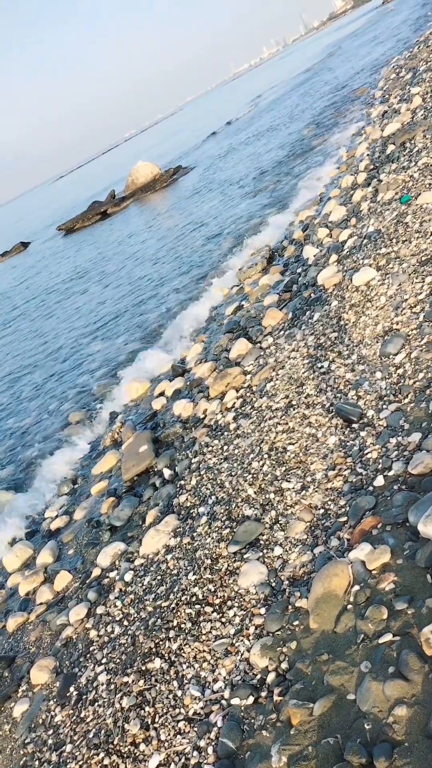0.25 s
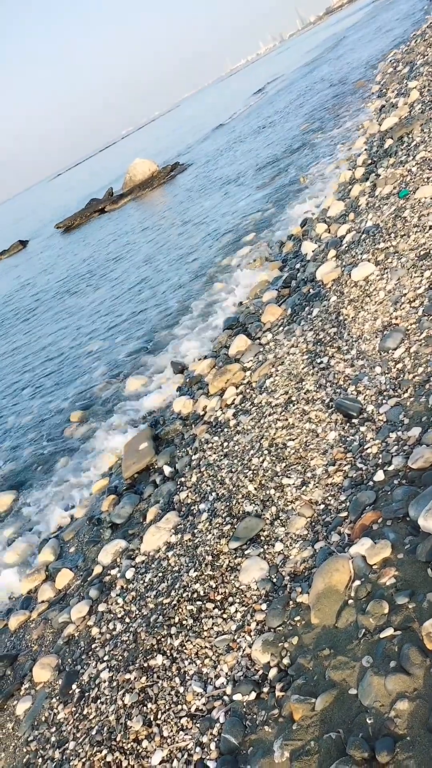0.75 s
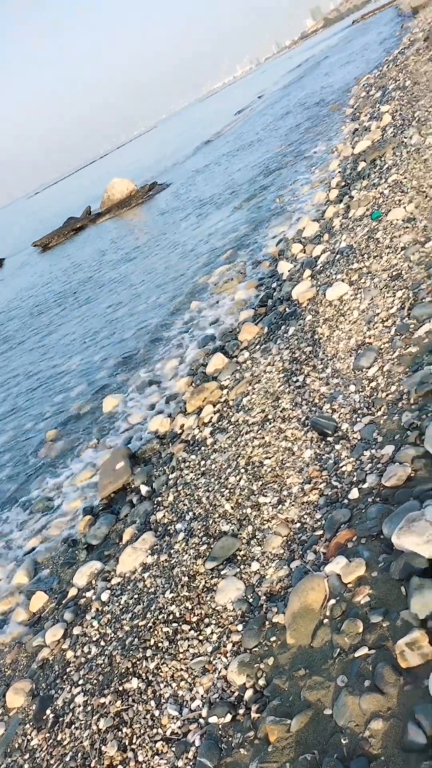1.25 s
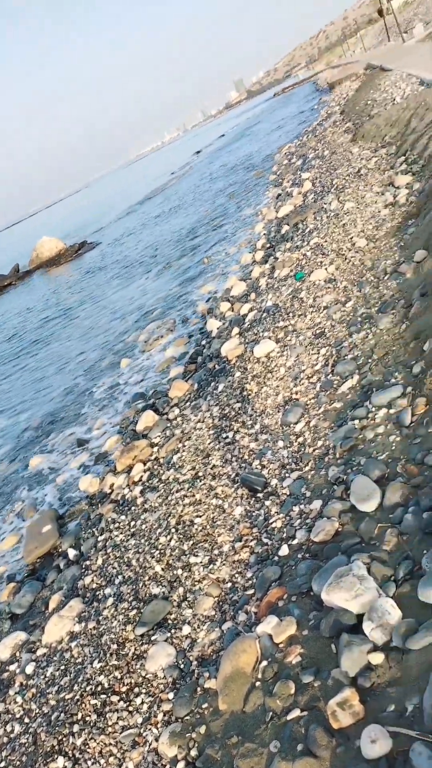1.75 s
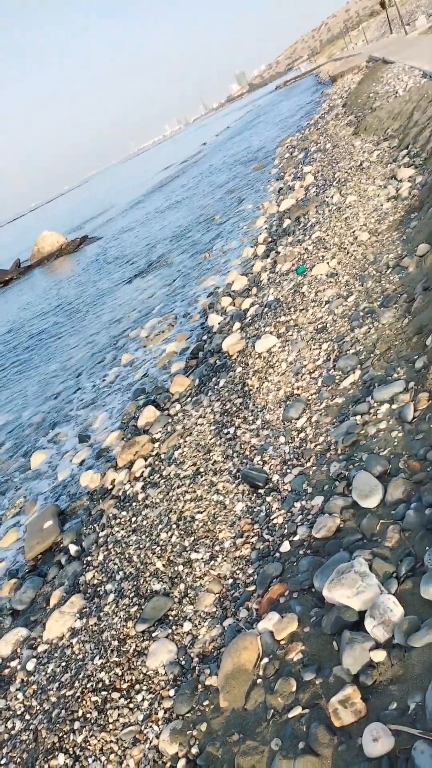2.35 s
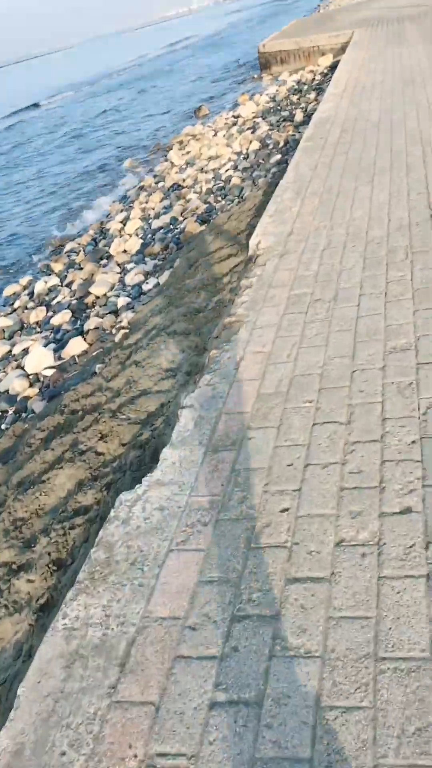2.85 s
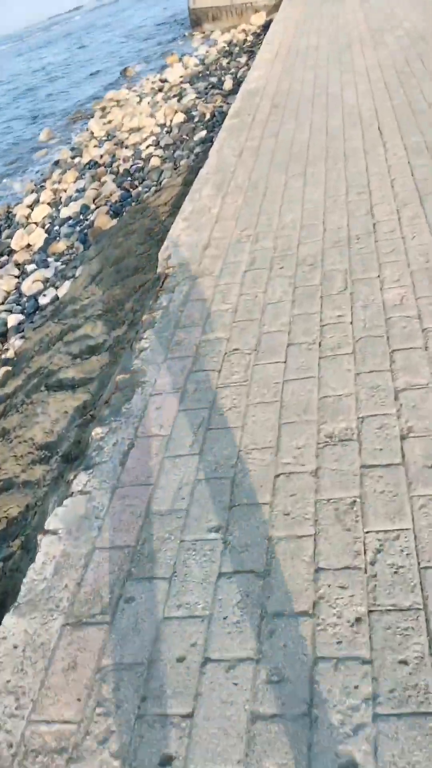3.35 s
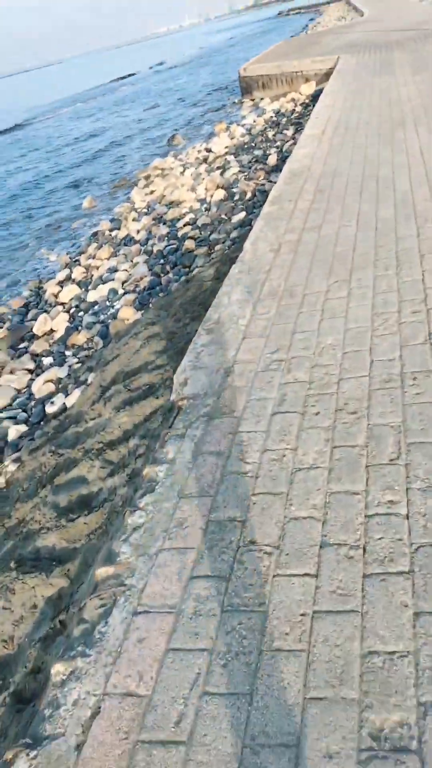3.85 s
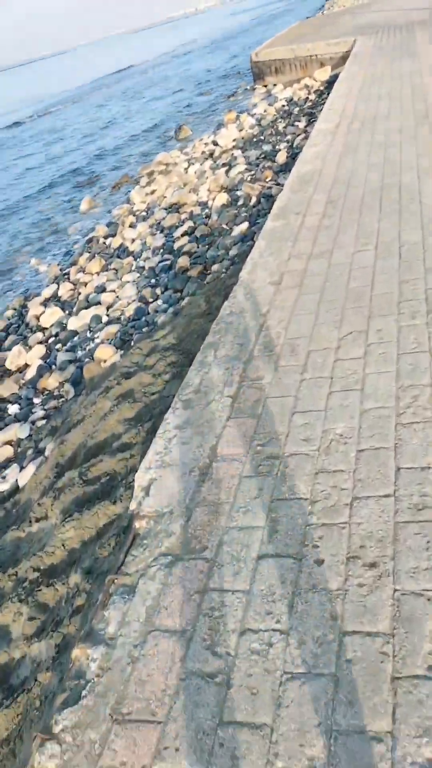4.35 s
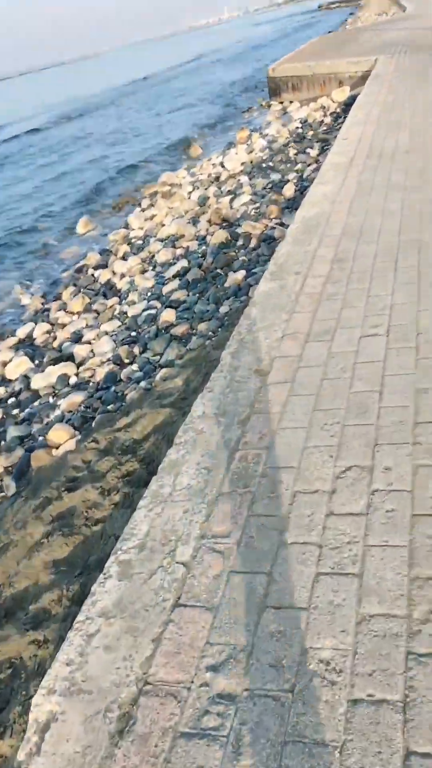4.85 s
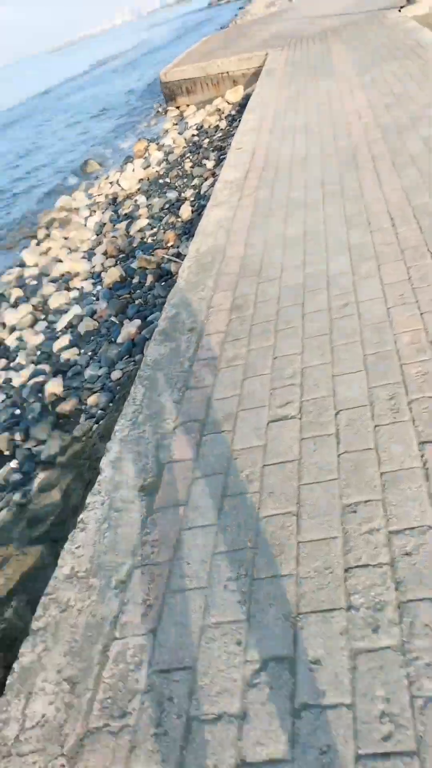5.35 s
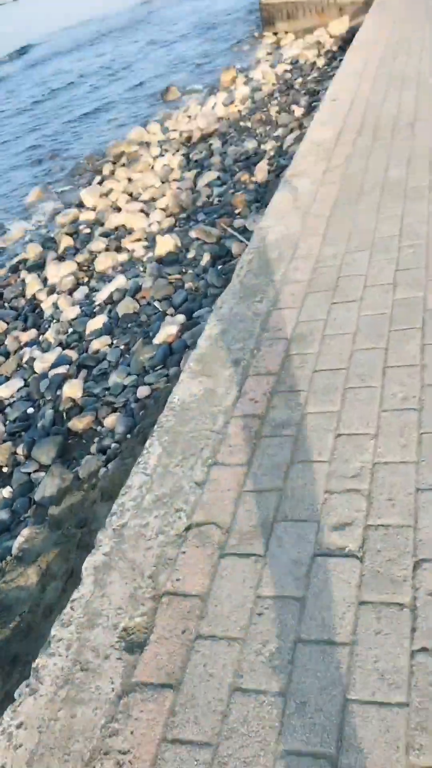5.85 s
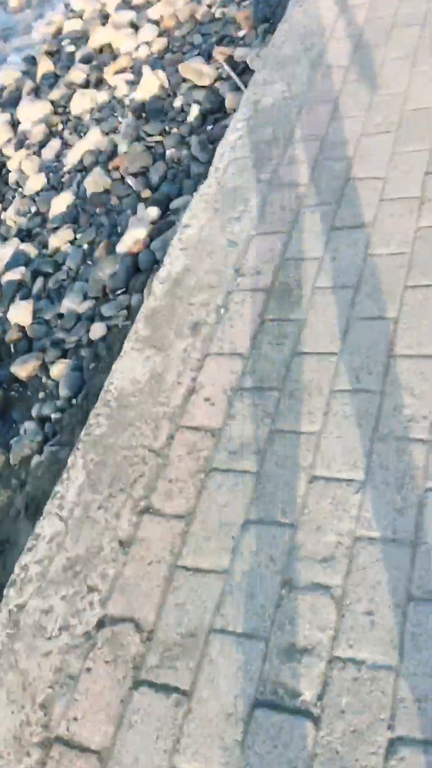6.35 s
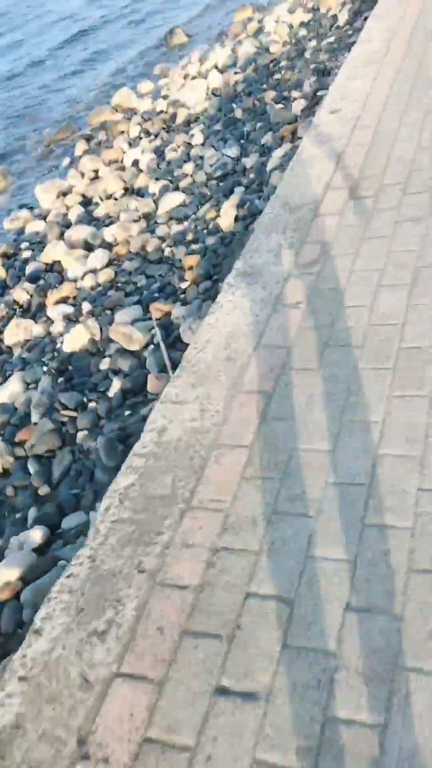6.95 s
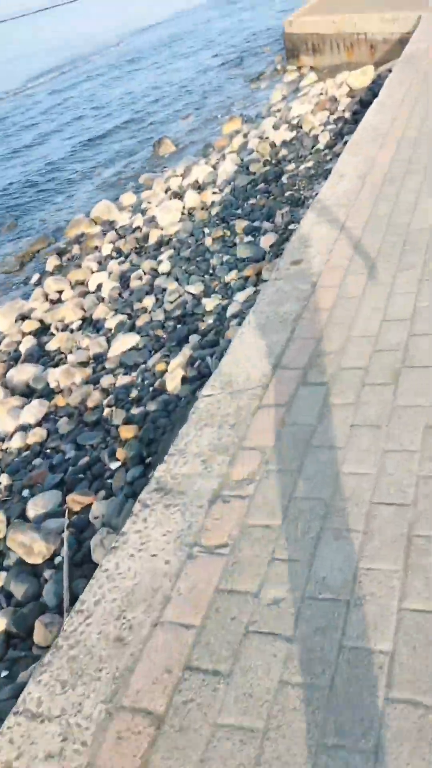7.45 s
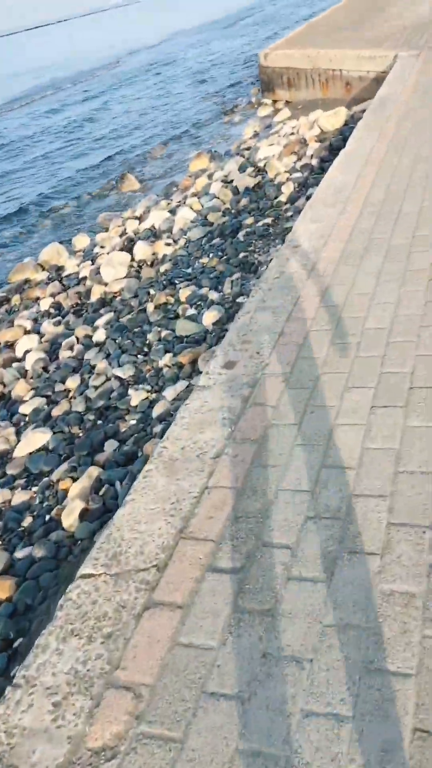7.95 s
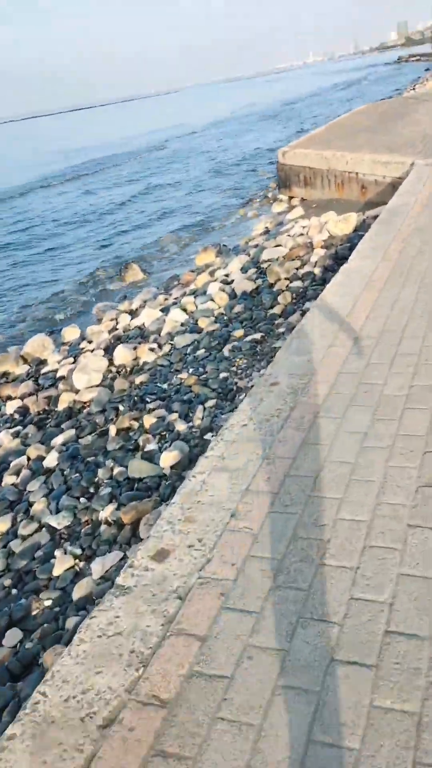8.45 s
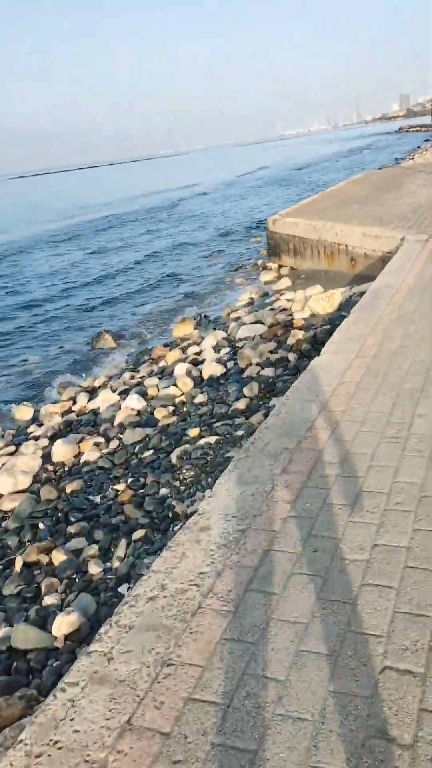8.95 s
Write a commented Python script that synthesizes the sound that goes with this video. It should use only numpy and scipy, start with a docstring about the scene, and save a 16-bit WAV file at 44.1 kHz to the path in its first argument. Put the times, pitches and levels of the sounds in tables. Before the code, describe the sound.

Gentle waves break, splash and trickle back through shore pebbles, with one brief dropout to silence after the first wave.

```python
"""A pebble shore, where four small waves break and drain away between the stones.
Ringing air bubbles make the water's sound: big ones churn and gulp, smaller ones splash, tiny ones fizz.
Pebbles knock, a calm sea murmurs, a few faint chirps sound and puffs of breeze touch the microphone.
The first wave is heard from the beach; after half a second of silence, three more from the path above."""
import sys
import numpy as np
from scipy import signal
from scipy.fft import rfft, irfft, next_fast_len
from scipy.io import wavfile
from scipy.ndimage import uniform_filter1d, map_coordinates

SR = 44100
rng = np.random.default_rng(int(sys.argv[2]) if len(sys.argv) > 2 else 0)


def dump(signal):
    """Clip the signal to [-1, 1] and save it as 16-bit WAV at the path in sys.argv[1]."""
    limited = np.clip(np.atleast_2d(signal).T, -1, 1)
    pcm = np.round(limited * 32767).astype(np.int16)
    wavfile.write(sys.argv[1], SR, pcm)


N = 405719

# A colour says how strong a sound is from low to high. Columns of every colour: pitch_hz, level_db
SEA_COLOUR = [(20, -29.5), (45, -13), (90, -4.5), (170, -4.5), (320, -5), (600, -13.5), (1100, -9.5),
              (1600, -15), (2050, -24.5), (2600, -15.5), (3900, -16.5), (4700, -26), (5900, -27),
              (8000, -37.5), (15500, -49)]  # open water
BREEZE_COLOUR = [(20, -22), (45, 1), (90, 1), (140, -2), (220, -25), (500, -61.5)]  # air rumbling on the microphone
PEBBLE_COLOUR = [(1500, -21.5), (3500, -4.5), (5000, -9), (7500, -20.5), (14000, -32)]  # small stones shifting
BOOM_COLOUR = [(25, -37.5), (50, -22.5), (85, -5), (125, 1), (185, 3), (280, -14.5), (600, -47.5)]  # a falling crest
SPRAY_COLOUR = [(3500, -38), (5000, 1), (6500, 4), (8000, -5), (10500, -9.5), (15500, -13.5)]  # fine spray
DRAIN_COLOUR = [(53, -40), (90, -9), (356, 1.5), (599, -6), (687, -7.5), (917, -8), (1110, -12),
                (1550, -13), (1800, -17.5), (2400, -18.5), (3120, -49), (5280, -120)]  # the second wave gurgling away
# Each wave meets other stones, so its water and foam have their own colours: pitch_hz, level_db
WATER_1 = [(120, -37.5), (200, -7), (251, -2.5), (297, 2), (336, -1), (401, 0), (494, 2.5), (543, 0.5),
           (1040, 0.5), (1230, -6), (1500, -6), (1700, -10), (2400, -15.5), (3120, -42.5), (5280, -120)]
WATER_2 = [(59, -52), (100, -20), (139, -18), (172, -19), (335, -7), (455, -7.5), (652, -7.5), (765, -10.5),
           (959, -10.5), (1250, -5.5), (1940, -7), (2400, -4), (3120, -15), (5280, -120)]
WATER_3 = [(29, -51), (50, -28), (76, -7.5), (109, -22), (183, -7.5), (438, -1), (475, -6.5), (559, -3.5),
           (636, -3.5), (851, -2.5), (1020, -6), (1260, -11), (1710, -8), (2070, -13.5), (2400, -26),
           (3120, -41), (5280, -120)]
WATER_4 = [(47, -38), (80, -19), (124, -24), (208, -6), (367, -1.5), (621, -6), (747, -6), (912, -6),
           (1020, -1), (1110, -2.5), (1750, -11.5), (1880, -11.5), (2400, -15.5), (3120, -32), (5280, -120)]
FOAM_1 = [(1290, -52), (2200, -5.5), (2590, -5.5), (3000, -3.5), (3770, 1), (4590, -14), (6060, -15.5),
          (7190, -22), (7740, -27), (10900, -31), (11800, -28), (12800, -39), (14700, -31), (15500, -34)]
FOAM_2 = [(1290, -33), (2200, -5.5), (2530, 0), (3590, -2), (3960, -3.5), (4480, -14), (5630, -15),
          (7800, -33), (11000, -51), (11300, -41), (12000, -41), (12600, -41), (15500, -48)]
FOAM_3 = [(1300, -31), (2200, -7), (2500, 1.5), (3000, -7), (3950, -3), (4600, -15), (5600, -12.5),
          (6800, -15.5), (7600, -27), (11000, -31.5), (12000, -34), (12800, -38), (15500, -40)]
FOAM_4 = [(1290, -41), (2200, -1.5), (2740, 1), (3360, -3), (3990, -1), (5230, -14.5), (5810, -9.5),
          (6310, -22.5), (6960, -18), (8190, -30), (11200, -30), (12100, -33), (15500, -41.5)]
# The stages the shore's sound fades through, counted from 0: water_colour, foam_colour
STAGES = [(WATER_1, FOAM_1), (WATER_2, FOAM_2), (DRAIN_COLOUR, FOAM_2),
          (WATER_3, FOAM_2), (WATER_3, FOAM_3), (WATER_4, FOAM_4)]
# Which stage is heard when: time_s, stage_number
STAGE_TIMES = [(2.5, 0), (2.8, 1), (3.2, 1), (3.7, 2), (4.8, 2),
               (5.1, 3), (5.4, 3), (5.7, 4), (6.2, 4), (6.6, 5)]

# Puffs of breeze: peak_s, level_db, half_length_s
PUFFS = [(4.56, -55, 0.022), (6.54, -50.5, 0.028), (6.617, -49.5, 0.018), (6.96, -57.5, 0.052),
         (7.427, -46.5, 0.034), (7.858, -61, .04), (8.44, -47, 0.025), (8.535, -50, 0.019)]
# Thin, very high chirps (ring_s is the time to fade by 60 dB): start_s, level_db, pitch_hz, ring_s
CHIRPS = [(4.539, -59, 11700, 0.062), (4.54, -71, 13600, .04), (5.506, -60, 11700, 0.064),
          (7.086, -54, 13150, .06), (7.088, -56, 15350, .04)]
# Pebbles knocking together: start_s, level_db, pitch_hz, ring_s
KNOCKS = [(3.758, -52, 4200, .008), (5.638, -30.5, 4010, 0.027), (7.122, -44, 2100, .05),
          (8.141, -38, 2600, .006), (8.387, -38, 4800, .003)]
# Big air pockets collapsing between stones: start_s, relative_level_db, pitch_hz, ring_s
GULPS = [(.226, -12.5, 630, 0.019), (.233, -11.5, 542, 0.036), (1.126, -45, 780, 0.046),
         (1.625, -48.5, 700, .057), (3.009, -30, 341, .067), (3.336, -38.5, 990, 0.033),
         (4.912, -38, 1434, .057), (4.914, -44, 1810, .04), (5.086, -38, 820, 0.037),
         (5.136, -38, 352, .06), (5.14, -43, 1010, .05), (5.275, -28, 218, 0.032), (5.294, -33, 895, 0.048),
         (5.36, -38, 645, .039), (5.371, -38, 960, .048), (5.424, -34, 217, .035),
         (5.732, -24.5, 844, 0.023), (5.815, -26.5, 532, 0.045), (5.891, -25.5, 556, 0.065),
         (5.932, -30, 397, .055), (5.944, -29.5, 670, .08), (6.381, -33.5, 252, 0.029),
         (6.598, -38, 1406, .044), (7.049, -42, 324, 0.057), (7.187, -39.5, 437, .084),
         (7.221, -45, 965, .089), (8.522, -36, 127, 0.13), (8.559, -31.5, 1760, 0.046),
         (8.574, -36, 1036, .067), (8.68, -30.5, 270, .081), (8.93, -37, 1720, .04),
         (8.953, -36, 1040, 0.056), (9.036, -34.5, 730, 0.056)]
# Depth of the drifting peaks and dips in the sound; later waves run among big stones: time_s, depth_db
HOLLOWNESS = [(0, 1.48), (5, 2.7), (5.6, 3), (9, 2.5)]

# The water has three layers: 0 is churn, 1 is splash, 2 is foam. Their levels below are relative.
# Water that keeps trickling between the stones: time_s, churn_db, splash_db, foam_db
TRICKLE = [(0, -70, -74, -75), (1.6, -67, -68.5, -65.5), (2.4, -56.5, -62, -73), (3.3, -52, -69.5, -55),
           (4.15, -51, -64, -60), (4.7, -52, -62, -55.5), (5.4, -57, -63.5, -56), (6.8, -49.5, -57, -57.5),
           (7.4, -52.5, -54.5, -57.5), (7.9, -53, -57, -60.5), (9.2, -51, -52.5, -59.5)]
# Wavelets that lap without breaking: peak_s, churn_db, splash_db, foam_db
WAVELETS = [(.34, -32, -42, -43), (.62, -44, -45, -51), (.8, -46, -50.5, -55), (1.05, -55, -58, -54),
            (2.38, -65, -68, -81), (3.47, -49.5, -73, -70), (3.95, -52, -62, -61), (4.25, -46, -70, -58.5),
            (5.12, -47, -63, -53.5), (5.24, -46, -74, -64), (5.37, -50, -77, -64), (5.64, -42, -61, -56),
            (6.21, -42.5, -58, -52), (6.47, -48.5, -50.5, -55), (6.62, -48, -55, -55), (7.2, -51, -70, -63),
            (7.56, -50, -54, -62), (8.15, -71, -52, -59), (8.57, -43, -54, -48.5), (8.91, -42.5, -56, -53)]
# Breaking waves: break_s, tumble_s, churn_delay_s, churn_db, splash_db, foam_db
WAVES = [(0.0, 0.17, 0.057, -24, -31.5, -29.5), (2.93, 0.099, 0.071, -36.5, -41, -41),
         (5.69, 0.39, 0.15, -38, -49, -46.5), (8.72, 0.23, 0.0069, -37.5, -41.5, -43)]
# How every wave swells, collapses and drains (the backwash starts below the crest): churn, splash, foam
RISE_DB_PER_S, COLLAPSE_DB_PER_S = (43.5, 43, 39.5), (72.5, 83, 76)
BACKWASH_DB, DRAIN_DB_PER_S = (-6.5, -6.5, -6), (25, 20, 22)


def amp(db):
    """Turn decibels into a number to multiply by."""
    return 10 ** (np.asarray(db) / 20)


def unit(x):
    """Scale a sound to an average power of 1."""
    return x / np.sqrt(np.mean(x ** 2) + 1e-20)


def clock():
    """The time of every sample, in seconds."""
    return np.arange(N) / SR


def noise():
    """Fresh white noise: an even hiss."""
    return rng.standard_normal(N)


def wobble(per_s):
    """A smooth curve through per_s random points a second."""
    return map_coordinates(rng.standard_normal(int(N * per_s / SR) + 4), [clock() * per_s])


def filtered(x, gain_at):
    """Turn each frequency up or down by gain_at(hz)."""
    size = next_fast_len(N + 8192)
    return irfft(rfft(x, size) * gain_at(np.fft.rfftfreq(size, 1 / SR)), size)[:N]


def coloured(x, colour):
    """Give a sound a colour and an average power of 1."""
    pitch_hz, db = np.transpose(colour)
    return unit(filtered(x, lambda hz: amp(np.interp(np.log(hz + 1), np.log(pitch_hz), db))))


def ping(start_s, db, hz, ring_s, attack_s, rise):
    """One dying tone; rise bends its pitch upward."""
    t = np.arange(SR // 6) / SR
    tone = np.sin(2 * np.pi * hz * t * (1 + rise * t / ring_s))
    loudness = amp(db - 60 * t / ring_s) * (1 - np.exp(-t / attack_s))
    return np.pad(tone * loudness, (round(start_s * SR), N))[:N]


def bubbles(count, low_hz, high_hz, cycles, spread_db, share):
    """Many ringing bubbles in hiss; a higher share (0 to 1) gives more ringing and less hiss."""
    when, pitch, size, phase = rng.random((count, 4)).T[:, :, None]
    hz = low_hz * (high_hz / low_hz) ** pitch
    samples = np.arange(int(min(cycles / low_hz, .06) * SR))
    age = samples / SR * hz / cycles
    strength = hz * amp(-spread_db * np.log(.01 + .99 * size))
    # each bubble's pitch creeps up as it nears the surface
    tone = np.sin(2 * np.pi * (cycles * age * (1 + .06 * age) + phase))
    ring = tone * amp(-60 * age) * (1 - np.exp(-30 * age))
    positions = (when * N).astype(int) + samples
    cloud = np.bincount(positions.ravel(), (strength * ring).ravel(), N)[:N]
    band_gain = np.sqrt(2 * (high_hz - low_hz) / SR)
    return np.sqrt(share) * band_gain * unit(cloud) + np.sqrt(1 - share) * noise()


def sea():
    """Ripples all along the shore blend into a murmur."""
    ripples = bubbles(count=2000, low_hz=144, high_hz=1610, cycles=14, spread_db=3, share=.4)
    return amp(-55 + 0.25 * wobble(4.8)) * coloured(ripples, SEA_COLOUR)


def breeze():
    """Each puff of air swirls at the microphone and rumbles briefly."""
    swell = sum(amp(db) * np.exp(-.5 * ((clock() - s) / half_s) ** 2) for s, db, half_s in PUFFS)
    return swell * coloured(noise(), BREEZE_COLOUR)


def chirps():
    """Faint, very high pips, each with a little tail of hiss."""
    pips = sum(ping(*chirp, attack_s=0.0025, rise=.006) for chirp in CHIRPS)
    tails = sum(amp(db - 18 - 60 * abs(clock() - s) / .14) * (clock() > s) for s, db, _, _ in CHIRPS)
    rasp = .8 + .35 * wobble(500) + .12 * wobble(4000)
    return pips * rasp + tails * coloured(noise(), [(4000, -30), (8000, 6), (15000, -4)])


def pebbles(foam_db):
    """A few stones knock clearly; many small ones tick as the water shifts them."""
    knocks = sum(ping(*knock, attack_s=0.00022, rise=0) for knock in KNOCKS)
    ticks = bubbles(count=1100, low_hz=2500, high_hz=10000, cycles=22, spread_db=1.1, share=0.85)
    return knocks + amp(foam_db - 15) * coloured(ticks, PEBBLE_COLOUR)


def gulps():
    """Trapped air rings briefly and echoes off the stones; big, low pockets start more softly."""
    rings = sum(ping(s, db + 1.5, hz, ring_s, attack_s=0.73 / hz, rise=0.0334)
                for s, db, hz, ring_s in GULPS)
    t = np.arange(SR // 16) / SR
    echo = rng.standard_normal(len(t)) * amp(-60 * t / .05)
    return rings + amp(-2) * signal.fftconvolve(rings, echo / np.linalg.norm(echo))[:N]


def boom(churn_db):
    """A heavy crest traps a cloud of air that booms; light ones hardly do."""
    return amp(-36 + 2.26 * (churn_db + 23)) * coloured(noise(), BOOM_COLOUR)


def trickle_power(layer):
    """Water keeps running between the stones, slowly changing in strength."""
    times, *levels = np.transpose(TRICKLE)
    return amp(np.interp(clock(), times, levels[layer])) ** 2


def wavelet_power(layer, rise_s=0.05, fall_s=0.085):
    """Each wavelet swells quickly and ebbs more slowly."""
    t = clock()
    return sum(amp(levels[layer]) ** 2 * np.exp(-((t - s) / np.where(t < s, rise_s, fall_s)) ** 2)
               for s, *levels in WAVELETS)


def wave_power(layer):
    """Each wave swells, tumbles, collapses fast and leaves a slowly draining backwash."""
    t, power = clock(), 0
    for break_s, tumble_s, churn_delay_s, *levels in WAVES:
        before_s = np.maximum(break_s + (churn_delay_s if layer == 0 else 0) - t, 0)
        after_s = np.maximum(t - break_s - tumble_s, 0)
        crest = amp(levels[layer] - RISE_DB_PER_S[layer] * before_s)
        collapse = amp(-COLLAPSE_DB_PER_S[layer] * after_s)
        backwash = amp(BACKWASH_DB[layer] - DRAIN_DB_PER_S[layer] * after_s)
        power = power + crest ** 2 * (collapse ** 2 + backwash ** 2 * (1 - collapse))
    return power


def hollow_stones(x):
    """Sound takes many paths over the stones, so some pitches swell while others fade."""
    spectrum = signal.stft(x, nperseg=1024)[2]
    patches = rng.standard_normal(spectrum.shape)
    for _ in range(2):  # blur across pitch and time
        patches = uniform_filter1d(uniform_filter1d(patches, size=3, axis=0), size=7, axis=1)
    times = np.linspace(0, (N - 1) / SR, spectrum.shape[1])
    depth_db = np.interp(times, *np.transpose(HOLLOWNESS))
    gain = amp(depth_db * unit(patches))
    gain /= np.sqrt(np.mean(gain ** 2, axis=0))
    return signal.istft(spectrum * gain, nperseg=1024)[1][:N]


def water(churn_db, splash_db, foam_db):
    """Big bubbles churn, drops splash and foam fizzes; a hard break also throws fine spray."""
    big = bubbles(count=4500, low_hz=145.5, high_hz=1253, cycles=19.6, spread_db=0.5, share=0.43)
    drops = bubbles(count=2600, low_hz=1073, high_hz=2550, cycles=23, spread_db=2.5, share=0.41)
    fizz = bubbles(count=11000, low_hz=2235, high_hz=9100, cycles=16, spread_db=2.5, share=0.35)
    mist = bubbles(count=9000, low_hz=4500, high_hz=15000, cycles=5, spread_db=2, share=0.35)
    lows = lambda hz: 1 / (1 + (hz / 1150) ** 16)
    stage = np.interp(clock(), *np.transpose(STAGE_TIMES))
    churn = splash = foam = 0
    for i, (water_colour, foam_colour) in enumerate(STAGES):
        fade = np.maximum(1 - abs(stage - i), 0)
        churn += fade * unit(filtered(coloured(big, water_colour), lows))
        splash += fade * unit(filtered(coloured(drops, water_colour), lambda hz: 1 - lows(hz)))
        foam += fade * coloured(fizz, foam_colour)
    breaking = 1 / (1 + amp(-3 * (foam_db + 50)))  # grows from 0 to 1 as the foam gets loud
    spray = amp(-19.5) * breaking * coloured(mist, SPRAY_COLOUR)
    slosh = wobble(35)
    return hollow_stones(churn * amp(churn_db - 1.29 + 0.5 * slosh)
                         + splash * amp(splash_db - 0.98 + .6 * slosh)
                         + (foam + spray) * amp(foam_db - 0.5 + 1.2 * slosh))


def scene():
    """Waves, wavelets and trickle wash the stones, with the calm sea behind."""
    powers = [wave_power(layer) + wavelet_power(layer) + trickle_power(layer) for layer in range(3)]
    churn_db, splash_db, foam_db = 10 * np.log10(powers)
    shore = water(churn_db, splash_db, foam_db) + boom(churn_db) + gulps() + pebbles(foam_db)
    return (shore + sea() + breeze() + chirps())[None]


def record(dry):
    """The microphone's opening rings at a very high pitch; silence falls between beach and path."""
    beach_end_s, path_start_s = 2.409, 2.923
    ring_hz, top_hz = 11900, 15700
    ringing = filtered(dry[0], lambda hz: amp(4.9 * np.exp(-((hz - ring_hz) / 300) ** 2)))
    sound_on = (clock() < beach_end_s) | (clock() > path_start_s)
    return filtered(ringing * sound_on, lambda hz: hz < top_hz)[None]


dry = scene()
out = record(dry)
dump(out)
```